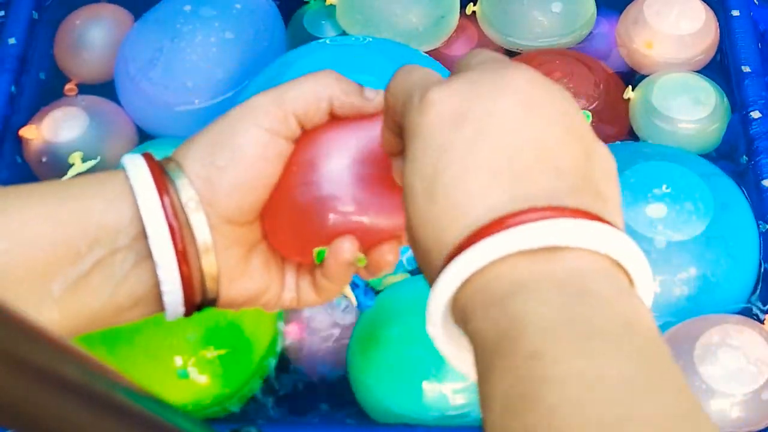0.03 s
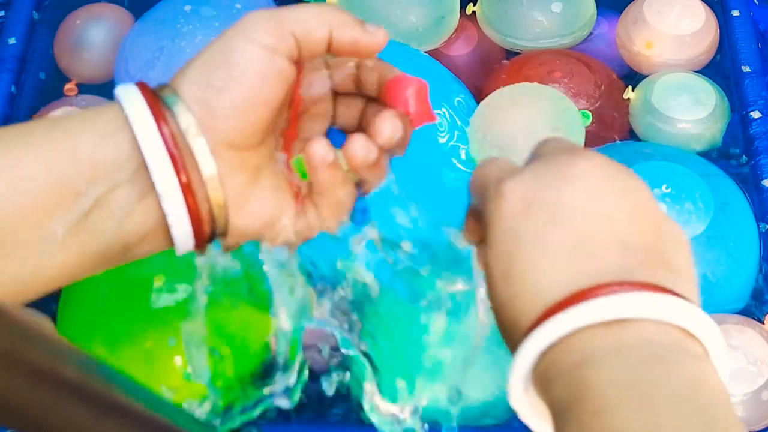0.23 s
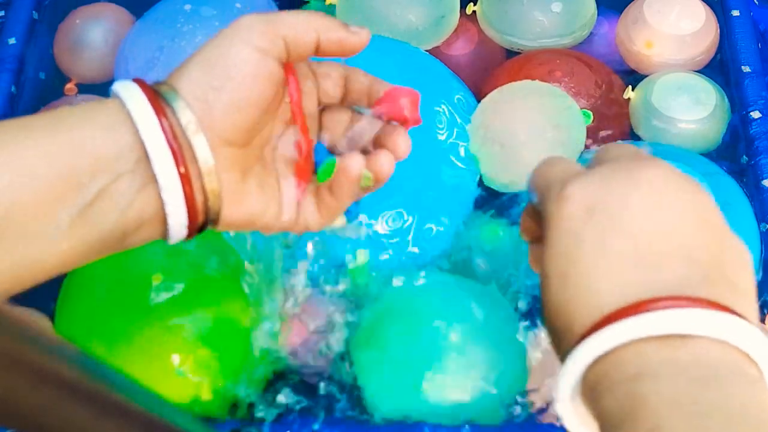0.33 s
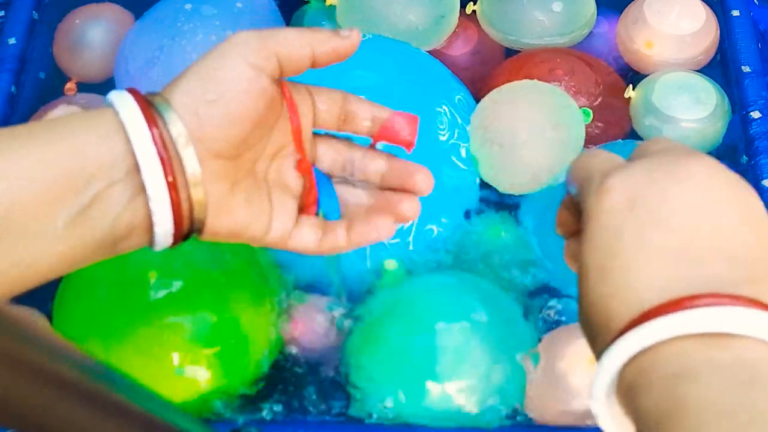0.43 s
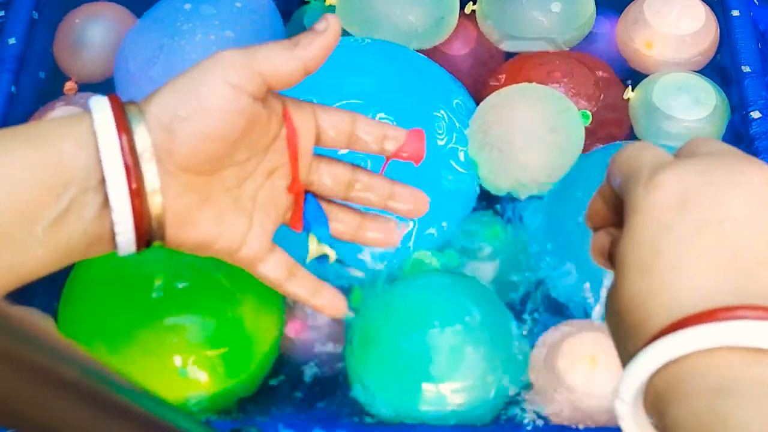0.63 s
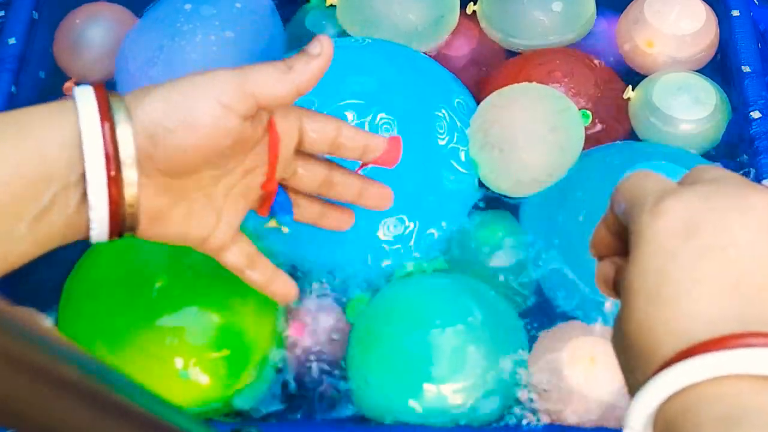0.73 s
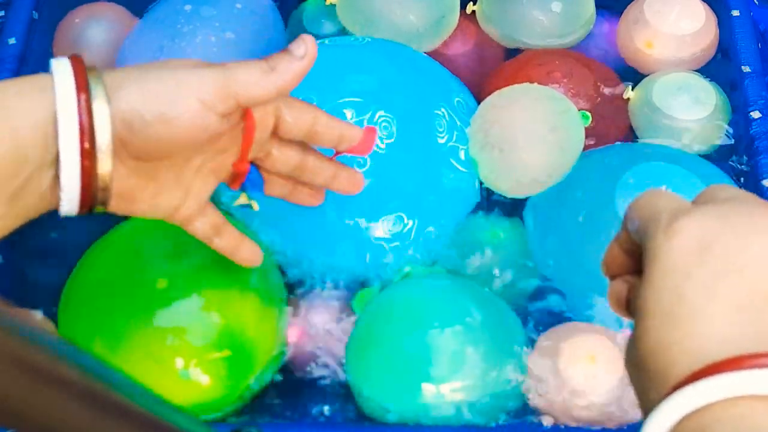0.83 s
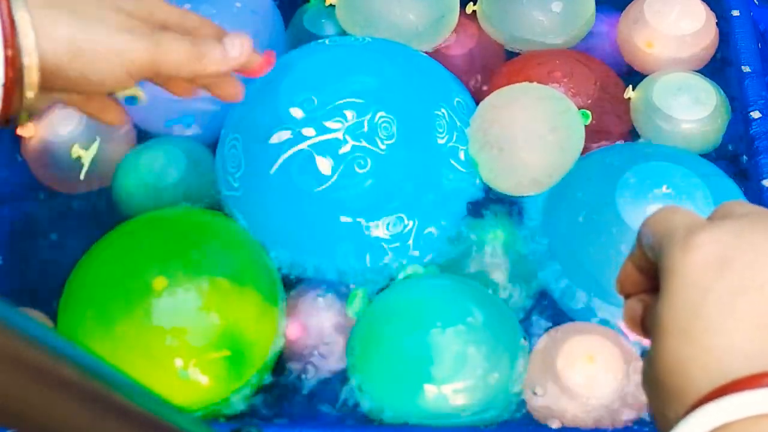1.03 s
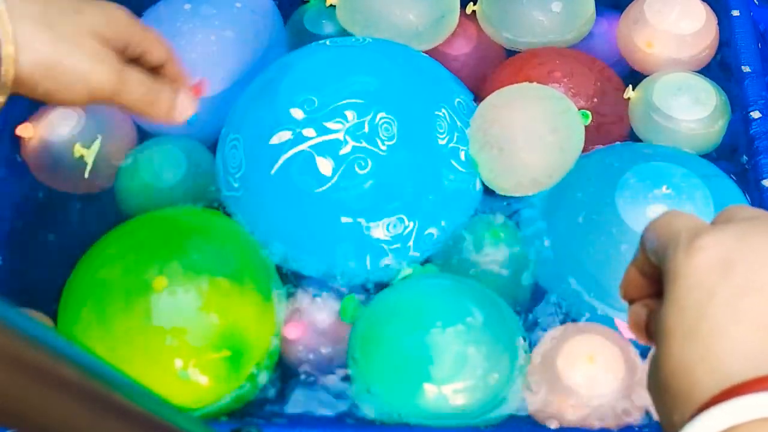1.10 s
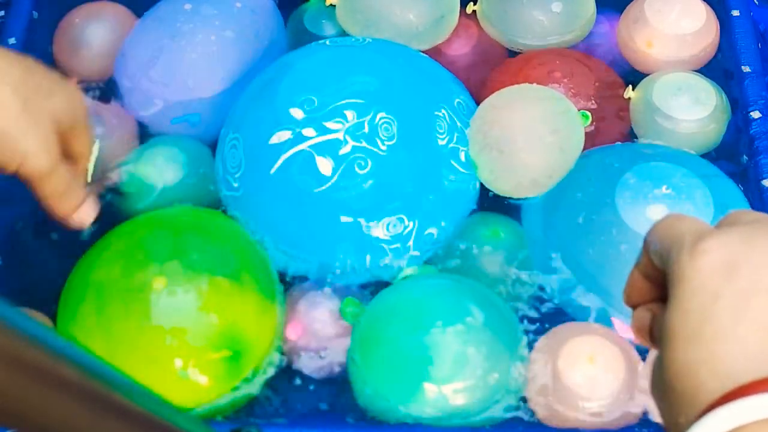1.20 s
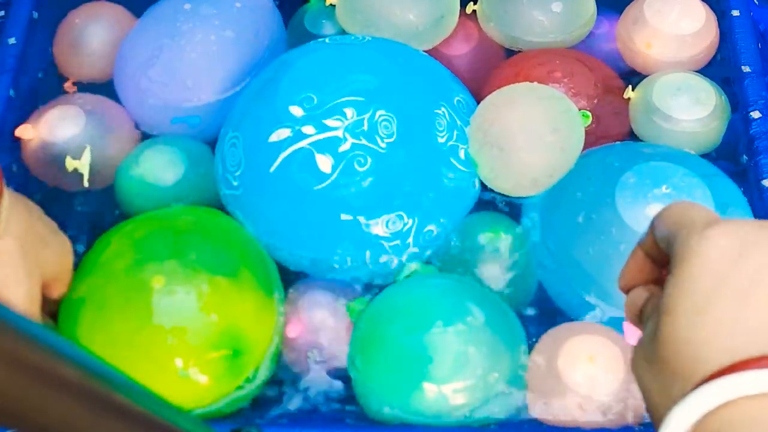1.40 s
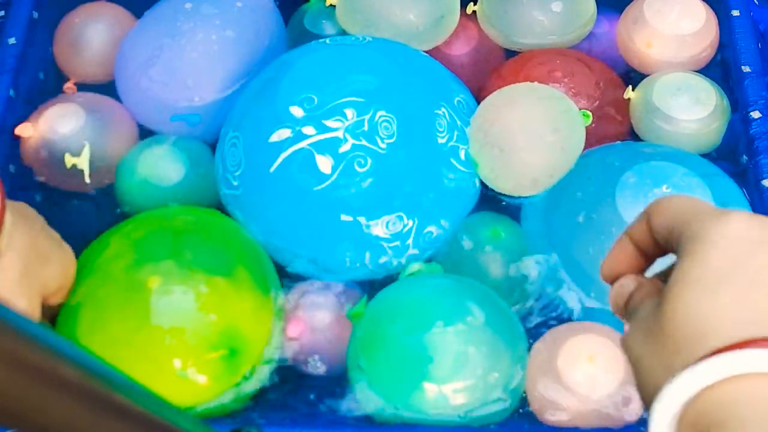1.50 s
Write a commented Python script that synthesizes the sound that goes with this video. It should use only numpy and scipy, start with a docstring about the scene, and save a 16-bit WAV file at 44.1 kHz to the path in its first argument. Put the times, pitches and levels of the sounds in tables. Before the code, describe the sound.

After a brief near-silence, a water balloon pops dry and bright; a moment later its water slaps and bubbles into a full tub, fading to drips, with soft wind buffets, close up outdoors with nearby walls.

```python
"""Over a faint outdoor background a water balloon is pricked in the hand and snaps, close to the microphone.
The freed water falls into a plastic tub of balloons and water: noise washes, swarms of bubbles, slaps, drips.
Two puffs of air, shaped low noise, buffet the microphone; nearby walls answer briefly with noise.
Far off, two soft bird notes sound, and at the end a small bird starts a falling whistle, a gliding sine."""
import sys
import numpy as np
from scipy import signal
from scipy.fft import rfft, irfft, next_fast_len
from scipy.io import wavfile
from scipy.ndimage import uniform_filter1d

SR = 44100
rng = np.random.default_rng(int(sys.argv[2]) if len(sys.argv) > 2 else 0)


def bounce(signal):
    """Save signal as a 16-bit WAV file at the path given by the first command-line argument."""
    frames = np.transpose(np.atleast_2d(signal))
    limited = np.clip(frames, -1, 1)
    pcm = np.round(limited * 32767).astype(np.int16)
    wavfile.write(sys.argv[1], SR, pcm)


N = 68355

# Levels are those ahead of any room or tone filter; colours are relative spectra.
# outdoor air colour: freq_hz, density_db [Hz, dB per Hz]
AIR_COLOUR = [(15, -51), (30, -25), (60, -12), (130, -1.5), (200, -0.5), (260, -10), (330, -4),
              (700, -14.5), (1200, -13.5), (2200, -26.5), (3900, -22.5), (5500, -34.5), (7600, -37.5),
              (9200, -50)]
AIR_START_DB, AIR_GROWS_DB_PER_S = -65, 0.32
# tone of the close sounds, a deep dip near 9 kHz, partly recovering above: freq_hz, gain_db [Hz, dB]
CLOSE_TONE = [(8000, -1), (8500, -8), (9300, -27), (11000, -12.5)]
RECORDER_TOP_HZ = 16100
ROOM_T60_S, ROOM_DB = 0.21, -11  # nearby walls

# faint far bird notes: start_s, length_s, pitch_hz, level_db (rms at the peak) [s, s, Hz, dB]
FAR_NOTES = [(0.913, 0.12, 501.5, -62), (1.153, 0.16, 507.3, -64.5)]
FAR_BLUR = 12.5  # phase drift, radians per root second
# falling whistle: time_s, pitch_hz, level_db [s, Hz, dB]
WHISTLE = [(1.492, 7740, -78.5), (1.504, 7480, -61), (1.514, 7200, -58), (1.528, 6845, -42),
           (1.535, 6780, -61), (1.55, 6220, -51.5)]
WHISTLE_ROUGH = 0.26  # rms flutter as a share of the tone
BIRD_ROOM_DB = -4.5

# level curve of each puff on the microphone: time_s, level_db [s, dB]
FIRST_PUFF = [(.694, -77), (.703, -43.5), (.723, -43), (.73, -28.5), (.748, -35.5), (.776, -26), (.81, -36),
              (.824, -55), (.85, -76)]
SECOND_PUFF = [(0.89, -63), (.965, -46.5), (.982, -46), (.997, -38), (1.028, -41.5), (1.068, -35.5),
               (1.088, -51), (1.125, -59.5), (1.16, -82)]
# puff colour: freq_hz, density_db [Hz, dB per Hz]
PUFF_COLOUR = [(18, -50.5), (35, -19.5), (70, -3.5), (130, 3.5), (200, 0), (330, -5), (1000, -19)]
# stronger air reaches higher: edge at a reference level, its climb, and the cutoff's exponent
PUFF_EDGE_HZ, PUFF_EDGE_AT_DB, PUFF_DB_PER_OCTAVE, PUFF_STEEP = 294, -30.5, 13.5, 4.94

# spray of the falling water: time_s, level_db [s, dB]
SPRAY_LEVEL = [(0.375, -58), (0.395, -36.5), (0.415, -40.5), (0.467, -32), (0.623, -43.5), (0.629, -49.5),
               (0.689, -39), (0.695, -43), (0.751, -57), (0.769, -43), (0.785, -55), (0.86, -71)]
# spray colour: freq_hz, density_db [Hz, dB per Hz]
SPRAY_COLOUR = [(300, -60), (900, -23), (1700, -4.5), (2050, -10.5), (2500, 2), (3100, -2.5), (3700, 2),
                (5200, -3.5), (7000, 0), (8300, -14.5), (9500, -20), (12000, -31), (16000, -17)]
# here and below, a grain's cycles are counted over its 60 dB decay
SPRAY_HISS_DB, SPRAY_GRAIN_DB, SPRAY_PER_S, SPRAY_HZ, SPRAY_CYCLES = -11, -6, 3000, 3985, 14.7
# droplets ticking on rubber
SPATTER_DB, SPATTER_PER_S, SPATTER_HZ, SPATTER_CYCLES = -14, 260, 7340, 4.2
# water churning in the tub: time_s, level_db [s, dB]
CHURN_LEVEL = [(0.405, -64.5), (0.498, -43), (0.52, -50.5), (0.53, -33.5), (0.602, -59), (0.68, -42),
               (0.838, -67.5), (0.896, -74), (0.95, -76.5)]
# churn colour: freq_hz, density_db [Hz, dB per Hz]
CHURN_COLOUR = [(100, -57), (400, -29), (600, 2.5), (800, 10), (1150, -8.5), (1500, 9), (2000, -11),
                (8000, -74)]
CHURN_HISS_DB, CHURN_GRAIN_DB, CHURN_PER_S, CHURN_HZ, CHURN_CYCLES = -7, -4.5, 410, 1202, 48
# water left rocking in the tub: time_s, level_db [s, dB]
SLOSH_LEVEL = [(.36, -95), (.48, -64.5), (.9, -60), (1.35, -74), (1.54, -79.5)]
# slosh colour: freq_hz, density_db [Hz, dB per Hz]
SLOSH_COLOUR = [(20, -32.5), (50, 3.5), (190, 2.5), (600, -3), (1150, -6), (1600, -17.5), (2200, -19.5),
                (4000, -19), (9000, -44.5)]

# short noise bursts: two early wall echoes of the pop, then slaps and drops, and one very faint
# high tick near the end: start_s, level_db, centre_hz [s, dB, Hz]
BURSTS = [(.2325, -26, 4030), (0.2469, -29, 3670), (.3700, -40, 6640), (.383, -35.5, 11000),
          (0.3919, -31.5, 4050), (0.3945, -30, 2040), (0.4007, -31.5, 3600), (0.429, -34, 3640),
          (0.4459, -25, 4250), (0.4628, -21.5, 3460), (0.4706, -35, 2500), (.4805, -23.5, 3900),
          (0.5259, -22.5, 6230), (0.5293, -22, 3070), (0.5302, -21, 1480), (0.5357, -23, 5400),
          (0.646, -32, 6200), (0.6618, -25.5, 2340), (0.668, -41, 7040), (0.6813, -24.5, 4900),
          (0.6855, -24, 4080), (0.6957, -37.5, 5750), (0.7682, -29, 6050), (0.801, -38, 9260),
          (.868, -44, 4260), (0.877, -44.5, 6050), (1.351, -53.5, 7000), (1.5165, -48, 12000)]
BURST_T60_S, BURST_OCTAVES = 0.0098, 0.74
BURST_CLICK_DB = -35  # broad click under the burst's own band
# ringing bubbles: start_s, level_db (lifted 2 dB when played), pitch_hz (at onset), t60_s [s, dB, Hz, s]
BUBBLES = [(.466, -34.5, 960, 0.028), (0.4748, -25, 3130, 0.0089), (0.479, -20, 3990, 0.011),
           (0.4906, -27, 1470, 0.034), (0.495, -28.5, 2846, 0.024), (.531, -39, 784.6, 0.13),
           (0.5327, -27, 1357, 0.023), (0.569, -23, 4620, 0.01), (0.577, -29.5, 2537, 0.03),
           (0.5789, -25, 3626, 0.024), (0.6037, -21, 6230, 0.0084), (0.6186, -23.5, 2454, 0.01),
           (.657, -37, 890, 0.029), (.668, -43.5, 638, 0.11), (0.665, -36.5, 2397, 0.067),
           (0.685, -31, 2720, 0.036), (0.7204, -37.5, 1550, 0.0097), (0.7469, -42, 1500, 0.042),
           (.772, -40, 555, 0.06), (.785, -45.5, 1817, 0.028), (.839, -52, 1630, 0.05),
           (0.867, -34.5, 3503, 0.023), (0.872, -41.5, 4250, 0.0086), (0.866, -54, 1600, 0.058),
           (0.887, -48, 1420, 0.05), (0.911, -51.5, 1426, 0.038)]
BUBBLE_RISE, BUBBLE_ATTACK_S = 0.038, 0.00069  # rise: share of the pitch gained over one t60
DRIP_START_DB, DRIP_PER_S, DRIP_HZ, DRIP_CYCLES = -70.5, 420, 6930, 78
DRIP_FROM_S, DRIP_FADE_DB_PER_S = 0.84, 14.5

# the balloon is pricked, then rips: start_s, level_db, crack_t60_s [s, dB, s]
SNAPS = [(0.2204, -18, .003), (0.2216, 1.5, 0.0035)]
# ring of the snapping skin: pitch_hz, level_db, t60_s [Hz, dB, s]
SKIN_MODES = [(1021, -31.5, .012), (1420, -25.5, 0.013), (2510, -15.5, 0.0078), (3385, -11, 0.0036),
              (4780, -2.5, 0.0034), (5880, -6.5, 0.0046), (7330, -15.5, 0.00799), (8280, -16, .008),
              (12220, -21, 0.013), (15100, -19.5, .006)]
CRACK_DB, SNAP_RISE_S = -9, 0.00014
# tone of the pop, little bass and a narrow dip near 1.8 kHz: freq_hz, gain_db [Hz, dB]
POP_TONE = [(100, -26.5), (400, -20.5), (700, -8.5), (1350, -3), (1820, -18), (2080, -2)]
# colour of the walls' answer: freq_hz, density_db [Hz, dB per Hz]
ECHO_COLOUR = [(300, -28), (800, -15), (1350, -5.5), (1900, -17), (2600, -8), (3900, 0.5), (5200, -5),
               (7100, -5.5), (8300, -14.5), (9500, -26.5), (16000, -23.5)]
ECHO_DB, ECHO_T60_S = -34, 0.26
# the tub rings after the pop: pitch_hz, level_db, t60_s [Hz, dB, s]
TUB_MODES = [(1400, -50, .2), (2790, -45, .17), (3876, -43.5, 0.17)]
THUMP_HZ, THUMP_DB, THUMP_T60_S = 217, -42, 0.033  # the freed water recoils
BODY_RISE_S = 0.004  # tub and water take a moment to answer
# the falling water tears into drops
SHRED_DB, SHRED_T60_S, SHRED_PER_S, SHRED_HZ, SHRED_CYCLES = -46.5, 0.42, 770, 4080, 5.3


def amp(db):
    """Decibels to gain."""
    return 10 ** (np.asarray(db) / 20)


def unit(x):
    """Scale to rms 1."""
    return x / np.sqrt(np.mean(x ** 2) + 1e-20)


def clock():
    """Time of each sample in seconds."""
    return np.arange(N) / SR


def swell(rows):
    """Gain from (time_s, level_db) points, silent outside them."""
    time_s, level_db = np.transpose(rows)
    t = clock()
    inside = (t > time_s[0]) * (t < time_s[-1])
    return amp(np.interp(t, time_s, level_db)) * inside


def filtered(x, response):
    """Multiply the spectrum of x by a response of frequency."""
    size = next_fast_len(N + SR // 2)
    spectrum = rfft(x, size) * response(np.fft.rfftfreq(size, 1 / SR))
    return irfft(spectrum, size)[:N]


def coloured(x, points):
    """Filter x through (freq_hz, gain_db) points on a log axis."""
    freq_hz, gain_db = np.transpose(points)
    return filtered(x, lambda hz: amp(np.interp(np.log(hz + 1), np.log(freq_hz + 1), gain_db)))


def noise(points):
    """Coloured noise of rms 1."""
    return unit(coloured(rng.standard_normal(N), points))


def steady(x, span_s):
    """Even out the slow level changes of x."""
    size = max(int(span_s * SR), 2)
    power = uniform_filter1d(uniform_filter1d(x * x, size), size)
    return x / np.sqrt(np.abs(power) + 1e-6)


def fade(t, t60):
    """Exponential decay, 60 dB down after t60 seconds."""
    return np.exp(-np.log(1000) * t / t60)


def add(out, start_s, x):
    """Mix x into out from start_s, cutting what runs past the end."""
    part = out[int(start_s * SR):][:len(x)]
    part += x[:len(part)]


def bubble(t, hz, t60, attack_s):
    """Air trapped in water: a damped tone whose pitch rises as it dies."""
    cycles = hz * t * (1 + BUBBLE_RISE * t / t60 / 2)
    return np.sin(2 * np.pi * cycles) * fade(t, t60) * (1 - np.exp(-t / attack_s))


def grains(per_s, centre_hz, cycles, octaves, scatter_db):
    """A random stream of small bubbles, rms 1, of scattered pitch and size."""
    draws = rng.random((int(per_s * N / SR), 4))
    start = (draws[:, :1] * N).astype(int)
    hz = centre_hz * 2 ** (octaves * (draws[:, 1:2] + draws[:, 2:3] - 1))
    size = amp(-scatter_db * np.log(np.maximum(draws[:, 3:], 0.03)))  # few are large
    k = np.arange(SR // 40)
    waves = size * bubble(k / SR, hz, cycles / hz, 0.5 / hz)
    return unit(np.bincount((start + k).ravel(), waves.ravel(), N)[:N])


def room(x):
    """Nearby walls: x convolved with a short decaying noise tail of unit energy."""
    t = np.arange(SR // 2) / SR
    tail = rng.standard_normal(len(t)) * fade(t, ROOM_T60_S) * (t > 0.003)
    return signal.fftconvolve(x, tail / np.linalg.norm(tail))[:N]


def outdoor_air():
    """The distant outdoors: steady coloured noise that grows very slightly."""
    return noise(AIR_COLOUR) * amp(AIR_START_DB + AIR_GROWS_DB_PER_S * clock())


def far_birds():
    """Soft distant coos: sines that swell and sink, blurred by a wandering phase."""
    out, t = np.zeros(N), clock()
    for start_s, length_s, hz, db in FAR_NOTES:
        progress = np.clip((t - start_s) / length_s, 0, 1)
        drift = FAR_BLUR * np.cumsum(rng.standard_normal(N)) / np.sqrt(SR)
        # 3 dB turns the rms level into a sine's peak
        out += amp(db + 3) * np.sin(np.pi * progress) * np.sin(2 * np.pi * hz * t + drift)
    return out


def bird():
    """A thin falling sine, roughened by low noise on its level and answered by the walls."""
    time_s, pitch_hz, level_db = np.transpose(WHISTLE)
    slow_noise = filtered(rng.standard_normal(N), lambda hz: np.exp(-hz / 250))
    flutter = 1 + WHISTLE_ROUGH * unit(slow_noise)
    cycles = np.cumsum(np.interp(clock(), time_s, pitch_hz)) / SR
    level = swell(np.transpose([time_s, level_db]))
    whistle = np.sqrt(2) * np.sin(2 * np.pi * cycles) * level * flutter
    return whistle + amp(BIRD_ROOM_DB) * room(whistle)


def puffs():
    """Moving air rumbles on the microphone port: deep when it is weak, brighter as it swells."""
    level = swell(FIRST_PUFF) + swell(SECOND_PUFF)
    hz, frame_s, frames = signal.stft(noise(PUFF_COLOUR), SR, nperseg=1024)
    frame_db = 20 * np.log10(np.interp(frame_s, clock(), level) + 1e-4)
    edge_hz = PUFF_EDGE_HZ * 2 ** ((frame_db - PUFF_EDGE_AT_DB) / PUFF_DB_PER_OCTAVE)
    lowpass = 1 / np.hypot(1, (hz[:, None] / edge_hz) ** PUFF_STEEP)
    rumble = signal.istft(frames * lowpass, SR)[1][:N]
    return level * steady(unit(rumble), 0.023)


def splash():
    """Fine spray and deeper churning, each bubbles on a wash of noise; then the water rocks and settles."""
    fine = grains(SPRAY_PER_S, SPRAY_HZ, SPRAY_CYCLES, octaves=1.68, scatter_db=5.0)
    deep = grains(CHURN_PER_S, CHURN_HZ, CHURN_CYCLES, octaves=1.046, scatter_db=5)
    ticks = grains(SPATTER_PER_S, SPATTER_HZ, SPATTER_CYCLES, octaves=0.83, scatter_db=1.0)

    spray = amp(SPRAY_HISS_DB) * noise(SPRAY_COLOUR)
    spray += amp(SPRAY_GRAIN_DB) * steady(unit(coloured(fine, SPRAY_COLOUR)), 0.068)
    spray += amp(SPATTER_DB) * unit(coloured(ticks, CLOSE_TONE))

    churn = amp(CHURN_HISS_DB) * noise(CHURN_COLOUR)
    churn += amp(CHURN_GRAIN_DB) * steady(deep, 0.031)

    slosh = noise(SLOSH_COLOUR)
    return swell(SPRAY_LEVEL) * spray + swell(CHURN_LEVEL) * churn + swell(SLOSH_LEVEL) * slosh


def noise_burst(t, hz):
    """A short, fast-fading noise in a broad band, over a faint wider click."""
    freq_hz = np.fft.rfftfreq(len(t), 1 / SR) + 1  # offset avoids log of zero
    band = 1 / (1 + (np.log2(freq_hz / hz) / BURST_OCTAVES) ** 2) ** 2
    band += amp(BURST_CLICK_DB) * np.minimum(freq_hz / hz, 1)
    burst = irfft(rfft(rng.standard_normal(len(t))) * band, len(t))
    return steady(unit(burst), 0.0015) * fade(t, BURST_T60_S) * (1 - np.exp(-t / 0.00037))


def bursts_and_drops():
    """Early echoes, slaps and a late tick as noise bursts; ringing bubbles; tiny drips; a room tail on all."""
    out, t = np.zeros(N), np.arange(SR // 10) / SR
    for start_s, db, hz in BURSTS:
        add(out, start_s, amp(db) * noise_burst(t, hz))
    for start_s, db, hz, t60 in BUBBLES:
        add(out, start_s, amp(db + 2) * bubble(t, hz, t60, BUBBLE_ATTACK_S))
    drips = grains(DRIP_PER_S, DRIP_HZ, DRIP_CYCLES, octaves=0.42, scatter_db=4.5)
    add(out, DRIP_FROM_S, drips * amp(DRIP_START_DB - DRIP_FADE_DB_PER_S * clock()))
    return coloured(out + amp(ROOM_DB) * room(out), CLOSE_TONE)


def snap():
    """Tight skin lets go: very short damped modes and a noise crack, shaped by the tone of the pop."""
    out, t = np.zeros(N), clock()
    ring = sum(amp(db) * np.cos(2 * np.pi * hz * (t - SNAP_RISE_S)) * fade(t, t60)
               for hz, db, t60 in SKIN_MODES)
    ring *= 1 - np.exp(-(t / SNAP_RISE_S) ** 2)
    for start_s, db, crack_t60 in SNAPS:
        crack = amp(CRACK_DB) * rng.standard_normal(N) * fade(t, crack_t60)
        add(out, start_s, amp(db) * (ring + crack))
    return coloured(coloured(out, CLOSE_TONE), POP_TONE)


def after_pop():
    """Walls answer with decaying noise, tub and water with damped tones; the water shreds into grains."""
    out, t = np.zeros(N), clock()
    walls = amp(ECHO_DB) * noise(ECHO_COLOUR) * fade(t, ECHO_T60_S)
    modes = TUB_MODES + [(THUMP_HZ, THUMP_DB, THUMP_T60_S)]
    body = sum(amp(db) * np.sin(2 * np.pi * hz * t) * fade(t, t60) for hz, db, t60 in modes)
    body *= 1 - np.exp(-t / BODY_RISE_S)
    torn = grains(SHRED_PER_S, SHRED_HZ, SHRED_CYCLES, octaves=1.8, scatter_db=3.0)
    shreds = amp(SHRED_DB) * unit(coloured(torn, ECHO_COLOUR)) * fade(t, SHRED_T60_S)
    add(out, SNAPS[-1][0], walls + body + shreds)  # all start with the rip
    return out


def scene():
    """The balloon, the tub, the air on the microphone, the birds and the outdoors together."""
    balloon = snap() + after_pop()
    water = splash() + bursts_and_drops()
    wind = puffs()
    distant = bird() + far_birds() + outdoor_air()
    return (balloon + water + wind + distant)[None]


def record(dry):
    """The recorder cuts off very steeply above its band limit."""
    return filtered(dry[0], lambda hz: 1 / (1 + (hz / RECORDER_TOP_HZ) ** 160))[None]


dry = scene()
out = record(dry)
bounce(out)
```